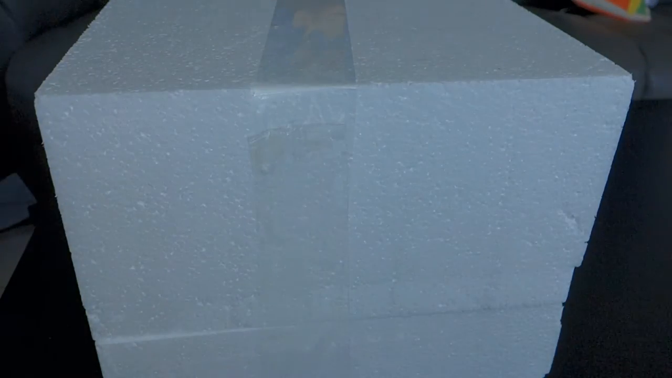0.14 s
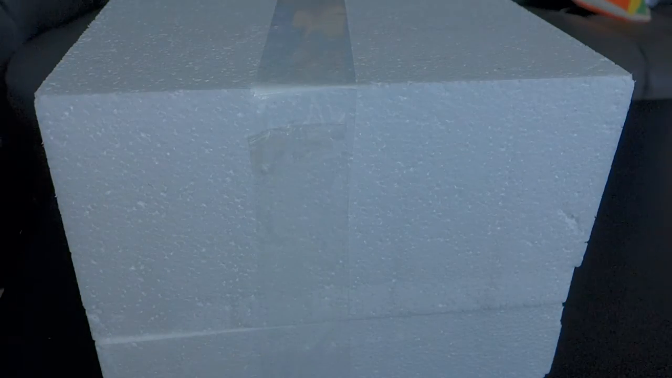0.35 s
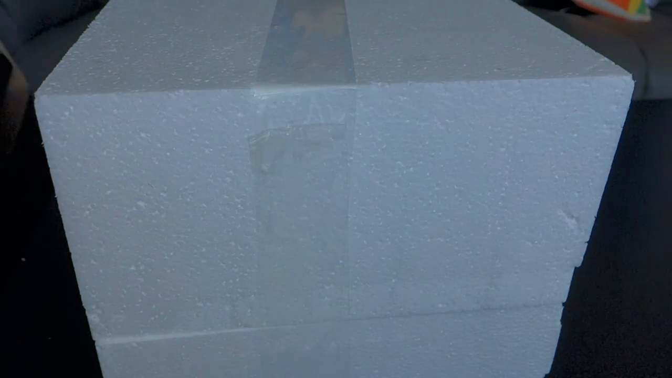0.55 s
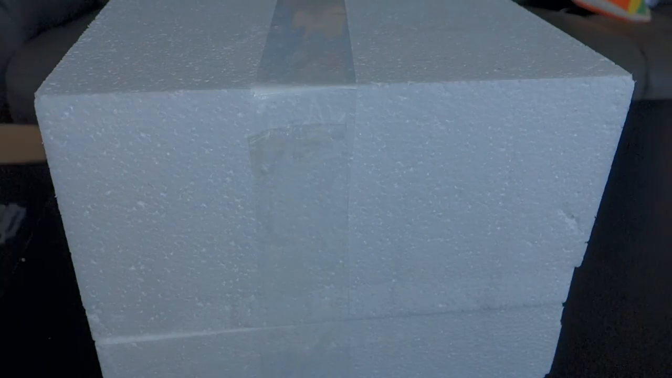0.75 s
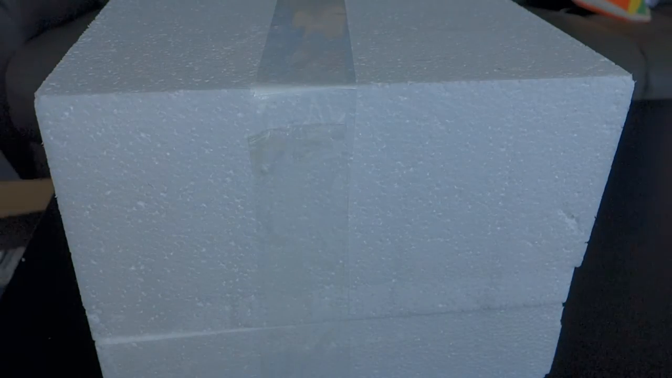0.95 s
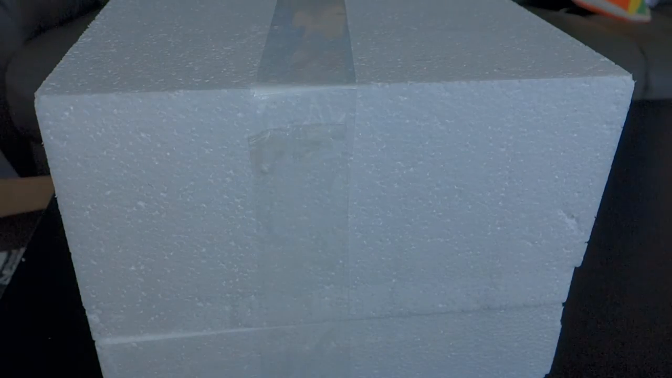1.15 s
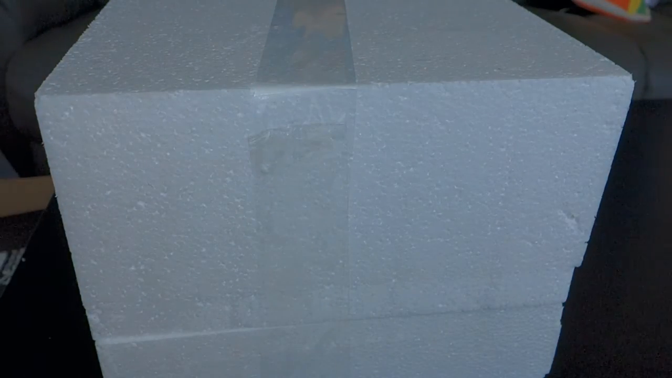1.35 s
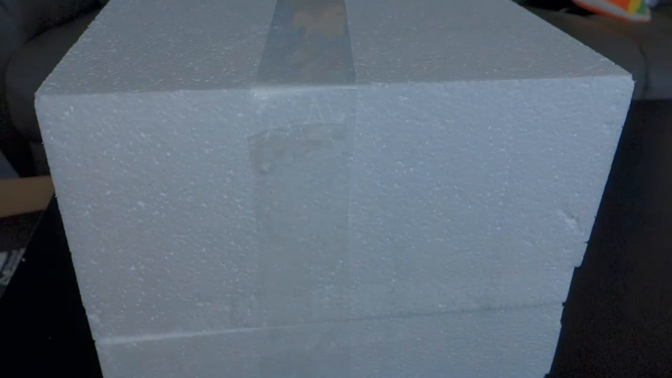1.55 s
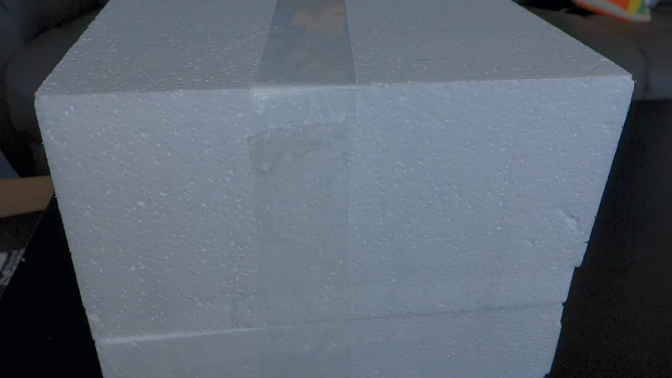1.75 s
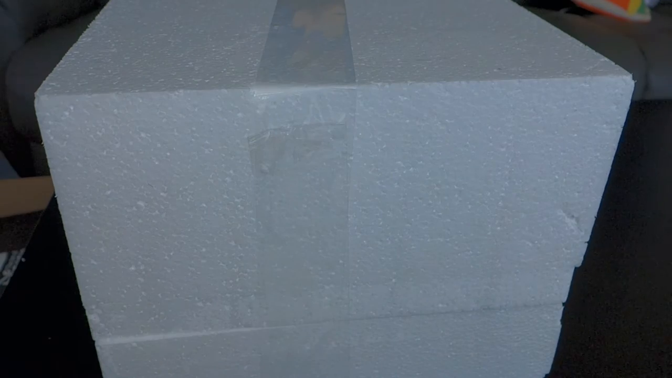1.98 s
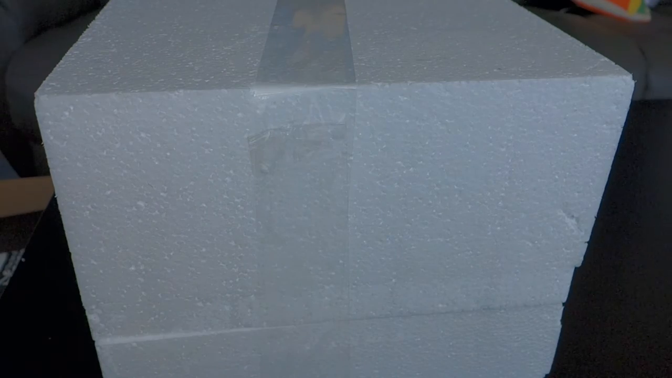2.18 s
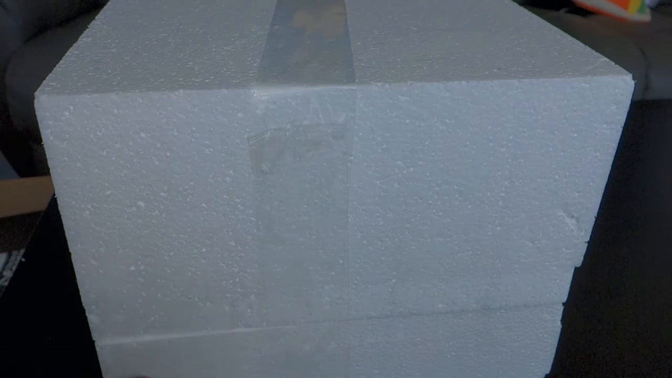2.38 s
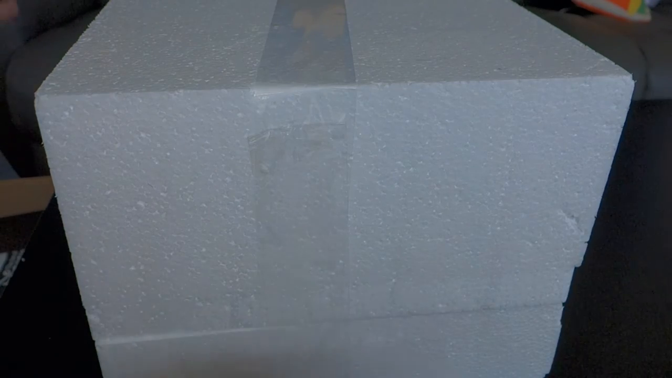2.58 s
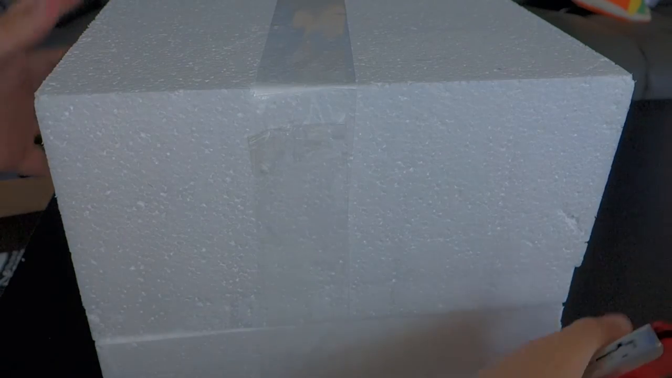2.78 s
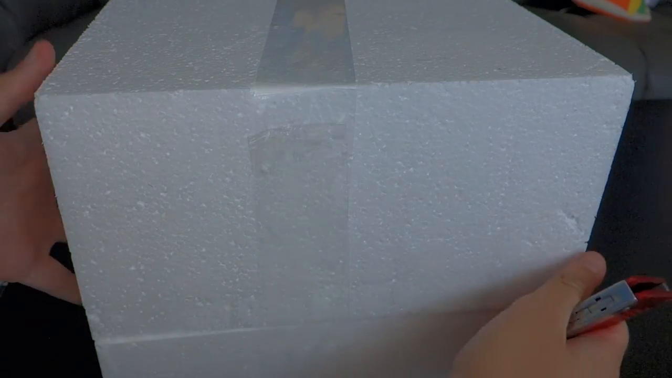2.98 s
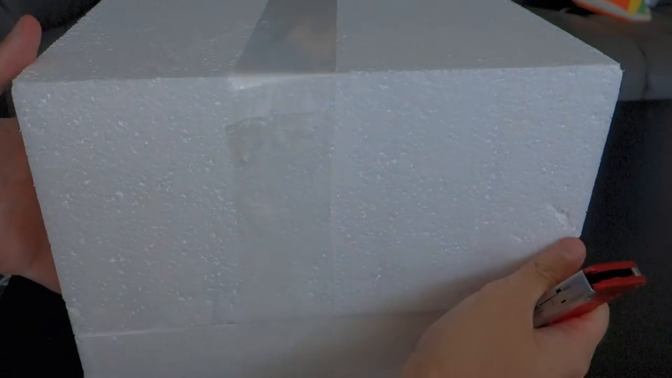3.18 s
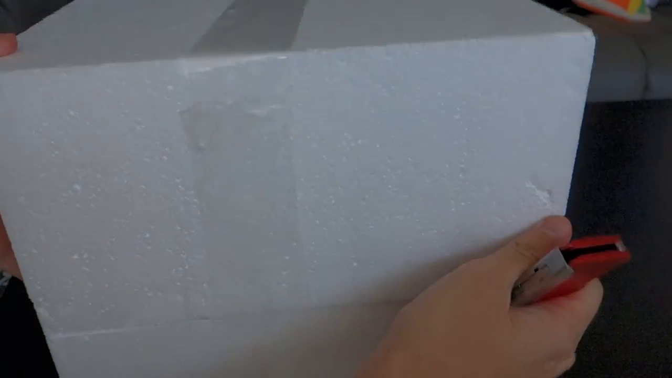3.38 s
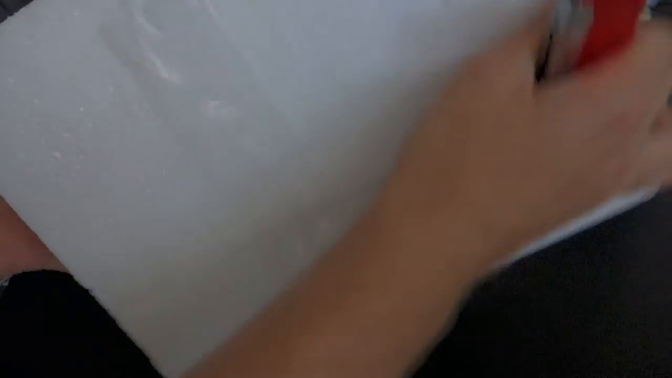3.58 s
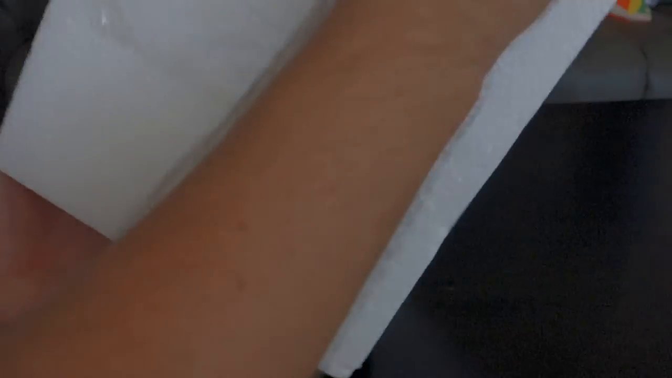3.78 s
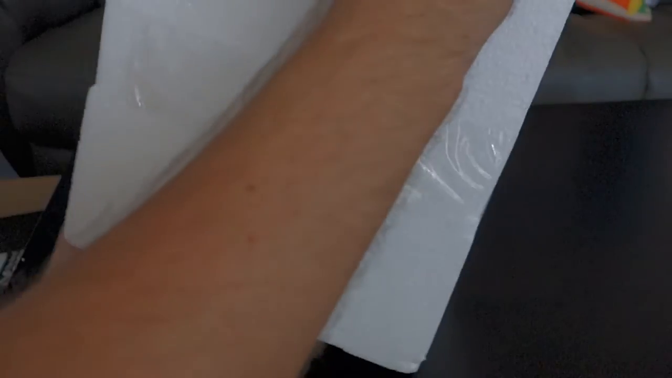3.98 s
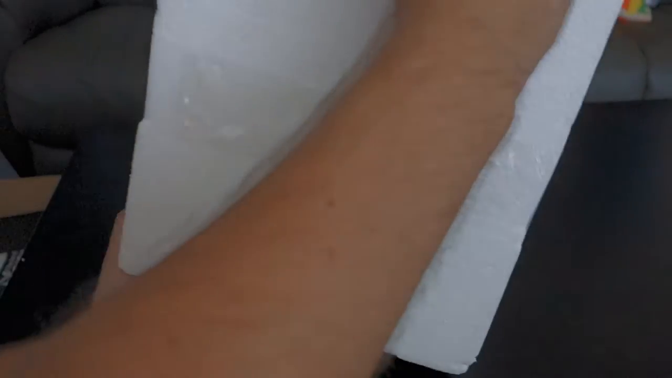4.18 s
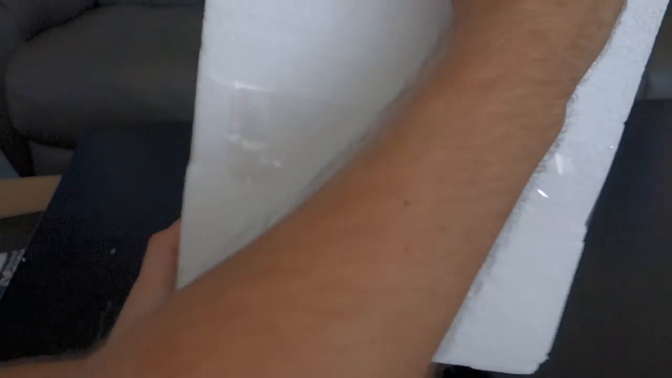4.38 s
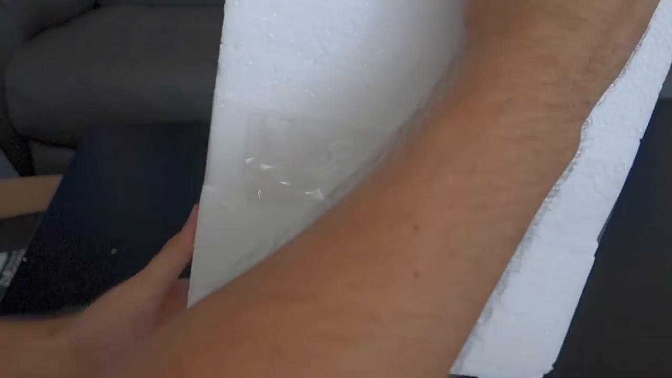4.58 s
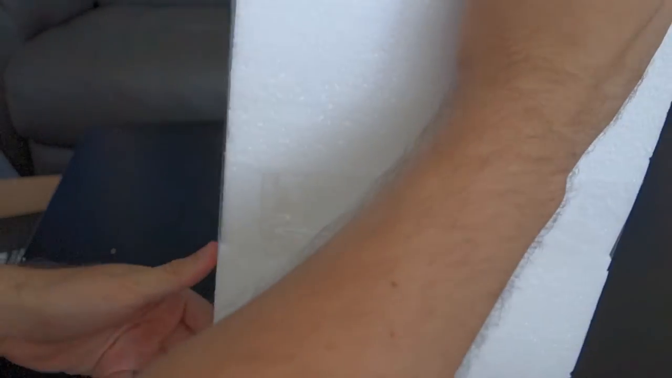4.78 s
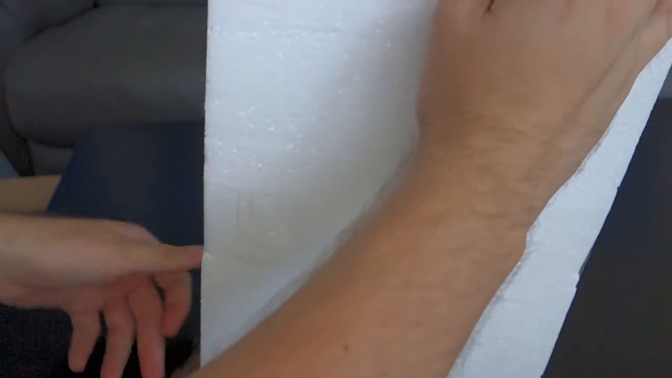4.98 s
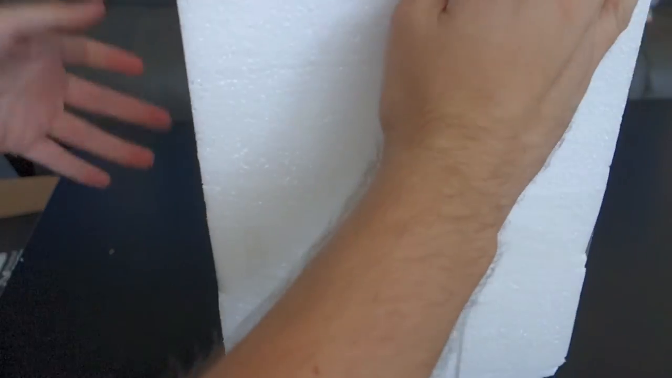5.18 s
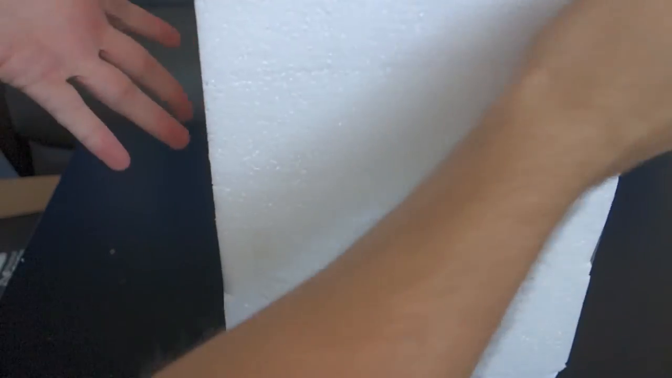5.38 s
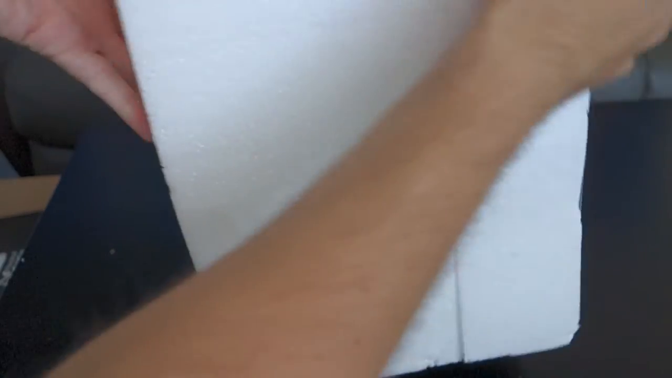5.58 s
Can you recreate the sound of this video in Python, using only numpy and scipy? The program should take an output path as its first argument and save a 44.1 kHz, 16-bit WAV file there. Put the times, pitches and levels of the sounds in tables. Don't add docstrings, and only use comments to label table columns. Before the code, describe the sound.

First, a hollow cardboard box is dragged at left with papery scuffs, a knock and a double thump. A lull leaves room hush, soft hum and small blade taps. Then polystyrene is handled close to the camera microphone, its beads scraping, fizzing, squeaking and cracking in uneven bursts, with low bumps against the table and a short room echo.

```python
import sys
import numpy as np
from scipy import signal
from scipy.fft import rfft, irfft, next_fast_len
from scipy.io import wavfile
from scipy.ndimage import uniform_filter1d

SR = 44100
rng = np.random.default_rng(int(sys.argv[2]) if len(sys.argv) > 2 else 0)


def transcribe(signal):
    frames = np.atleast_2d(signal).T
    limited = np.clip(frames, -1, 1)
    pcm = np.round(limited * 32767).astype(np.int16)
    wavfile.write(sys.argv[1], SR, pcm)


def nominal_scale(level):
    x = np.asarray(level, float) / 20
    return 10 ** x


N = 248724


def unit(x):
    return x / np.sqrt(np.mean(x ** 2) + 1e-20)


def along(points, hz):
    f, v = np.transpose(points)
    return np.interp(np.log(hz + 1), np.log(f + 1), v)


def add(track, s, sound):
    part = track[..., round(s * SR):][..., :sound.shape[-1]]
    part += sound[..., :part.shape[-1]]


def filtered(x, response):
    m = next_fast_len(N + SR // 2)
    return irfft(rfft(x, m) * response(np.fft.rfftfreq(m, 1 / SR)), m)[..., :N]


def colour(spectrum):
    return lambda hz: nominal_scale(along(spectrum, hz)) * np.minimum(hz / spectrum[0][0], 1) ** 3


def modes(table):
    def response(f):
        total = 0
        for k, (centre, width, db) in enumerate(table):
            resonance = 1j * f * width / (centre * centre - f * f + 1j * f * width)
            total = total + (-1) ** k * nominal_scale(db) * resonance
        return total
    return response


def strokes(rows, fade_db_per_s, offset_db=0, follows=0):
    t = np.arange(0, N + 16, 16) / SR
    power = np.zeros(len(t))
    for s, rise, hold, db, *kind in rows:
        rise_db = 20 * (np.maximum(s - t, 0) / max(rise, 0.003)) ** 0.94
        fade_db = fade_db_per_s * np.maximum(t - s - hold, 0)
        loss_db = np.minimum(rise_db + fade_db, 150)
        power += nominal_scale(db + offset_db + follows * sum(kind) - loss_db) ** 2
    return np.interp(np.arange(N) / SR, t, np.sqrt(power))


# [f/Hz, likeness/1]
LIKENESS = [(60, 1), (250, 1), (1000, 0.9), (2000, 0.73), (4000, 0.51), (8000, 0.029), (14000, 0.02)]


def friction(response, patchy_db, slip_db, slips):
    z = signal.stft(rng.standard_normal((2, N)), nperseg=256)[2]
    patches = uniform_filter1d(rng.standard_normal(z.shape[1:]), 4, axis=0)
    patches = unit(uniform_filter1d(patches, 18, axis=1))
    pair = signal.istft(z * nominal_scale(patchy_db * patches), nperseg=256)[1][:, :N]

    slip_sizes = np.minimum(rng.exponential(size=N // 20), 3.5)
    when = np.arange(N) * np.clip(slips, 5, 2000) / SR
    pair = pair * nominal_scale(slip_db * np.interp(when, np.arange(len(slip_sizes)), slip_sizes))

    def spread(hz):
        angle = np.arccos(np.clip(along(LIKENESS, hz), -1, 1)) / 2
        return response(hz) * [np.cos(angle), np.sin(angle)]
    mid, side = filtered(pair, spread)
    return unit(np.array([mid + side, mid - side]))


# [f/Hz, level/dB per Hz]
HUSH = [(13, -68), (22, -29), (80, -6.5), (174, -8.5), (205, -4.5), (310, -7.5), (398, -9.5), (444, -8.5),
        (690, -10), (961, -13), (1810, -16), (2900, -25.5), (13600, -34.5), (16000, -34)]
# [f/Hz, width/Hz, level/dB]
APPLIANCE = [(130, 26, -80), (156.3, 12, -68.5), (203.8, 20, -67.5), (262.4, 18, -69.5)]
# [t/s, level/dB]
TRAFFIC = [
    (0, -57),
    (.9, -81),
    (1.08, -49),
    (1.49, -74),
    (2.34, -85),
    (3.27, -66),
    (3.63, -76.5),
    (4.2, -62.5),
    (5.64, -65.5),
]
# [t/s, rise/s, hold/s, level/dB]
TABLE_SWAYS = [
    (1.02, 0.073, .08, -66),
    (5.23, 0.088, 0.018, -54.5),
]


def quiet():
    t = np.arange(N) / SR

    def blur(hz, width):
        return unit(filtered(rng.standard_normal(N), lambda f: modes([(hz, width, 0)])(f) ** 2))

    hush = nominal_scale(-58) * friction(colour(HUSH), patchy_db=0.5, slip_db=0.1, slips=40)
    hum = sum(nominal_scale(db) * blur(hz, width) for hz, width, db in APPLIANCE)
    hum += nominal_scale(-58) * np.sin(2 * np.pi * 204 * t + 0.9 * blur(6, 10))
    traffic = nominal_scale(np.interp(t, *np.transpose(TRAFFIC))) * blur(80, 29)
    sway = (nominal_scale(-78.5) + strokes(TABLE_SWAYS, fade_db_per_s=106)) * blur(22, 22)
    return hush + hum + traffic + sway


# [f/Hz, t60/s]
ROOM_DECAY = [(100, 0.22), (500, 0.21), (2000, 0.66), (6000, 0.57), (14000, 0.14)]


def room(x):
    hz, t, z = signal.stft(rng.standard_normal((2, SR * 2 // 3)), SR, nperseg=256)
    likeness = along(LIKENESS, hz)[:, None]
    z[1] = likeness * z[0] + np.sqrt(1 - np.clip(likeness, 0, 1) ** 2) * z[1]
    decay = nominal_scale(-60 * t / along(ROOM_DECAY, hz)[:, None])
    tail = signal.istft(z * decay, SR, nperseg=256)[1]
    late = np.pad(x.mean(axis=0), (200, 0))[None]
    return signal.fftconvolve(late, tail / np.linalg.norm(tail[0]), axes=1)[:, :N]


# [t/s, rise/s, hold/s, drumming level/dB, sliding: hiss over drumming/dB]
CARTON_MOVES = [(0, .02, 0.003, -39, -13.5), (.03, 0.016, .02, -51.5, -1), (.121, 0.0073, 0.1, -45.5, -9),
                (.252, 0.011, 0.031, -33.5, -22), (.3, 0.15, 0.11, -48.5, -11),
                (.485, 0.015, 0.063, -52.5, 1.5), (.61, 0.13, 0.0042, -44, -4.5),
                (.72, 0.08, 0.12, -54, -6), (.86, 0.19, 0.0017, -47.5, -13), (.9, 0.038, .05, -57, -2),
                (.96, 0.0032, 0.026, -19.5, -28.5), (1.05, 0.076, 0.029, -20, -21.5),
                (1.18, 0.22, 0.025, -40.5, -16), (1.32, 0.14, 0.041, -68, 5.5),
                (1.64, 0.12, 0.016, -48.5, -13.5), (1.745, 0.018, 0.021, -67, 20.5),
                (1.83, 0.051, 0.21, -86.5, 19.5)]
# [t/s, rise/s, hold/s, level/dB]
EDGE_SCUFFS = [
    (0.727, 0.14, 0.098, -57),
    (.958, 0.0033, 0.0082, -37.5),
    (1.025, 0.023, 0.0041, -34),
    (1.062, .04, 0.047, -37.5),
    (.248, .004, 0.016, -58),
    (0.124, 0.011, 0.025, -52.5),
]
# [f/Hz, width/Hz, level/dB]
CARTON_PANELS = [(70.6, 18, -34), (135, 93, -7), (204, 26, 0.5), (245, 15, 4), (299.5, 19.7, 5),
                 (336, 33, 5), (401, 70, -0.5), (497, 74, -1.5), (567, 30, -3.5), (619, 44, -4.5),
                 (750, 23, -18)]
# [f/Hz, level/dB per Hz]
EDGE_COLOUR = [(700, -0.5), (1000, -3.5), (1550, -7), (2100, -9.5), (2600, -12.5), (4000, -20.5),
               (5200, -42), (8800, -120)]
# [f/Hz, level/dB per Hz]
PAPER_COLOUR = [(1760, -17.5), (3000, -10.5), (4660, -8), (9140, -12), (10000, -14), (15000, -19),
                (16000, -46)]


def carton():
    fade = 174
    drum = strokes(CARTON_MOVES, fade)
    face = strokes(CARTON_MOVES, fade, follows=1)
    edge = strokes(CARTON_MOVES, fade, offset_db=-1, follows=0.52) + strokes(EDGE_SCUFFS, fade)

    def hollow(f):
        return modes(CARTON_PANELS)(f) / (1 + (f / 1100) ** 4) / (1 + (60 / (f + 1)) ** 6)

    sound = drum * friction(hollow, patchy_db=0.5, slip_db=2.0, slips=110)
    scrape = edge * friction(colour(EDGE_COLOUR), patchy_db=2.0, slip_db=0.5, slips=180)
    sound += nominal_scale([[1.2], [-1.2]]) * scrape
    sound += face * friction(colour(PAPER_COLOUR), patchy_db=-1.0, slip_db=2.0, slips=380)
    return sound * nominal_scale([[0.3], [-0.3]])


# [t/s, peak level/dB, f/Hz, t60/s, lower mode level/dB]
BLOWS = [(.118, -31, 600, 0.025, -5), (0.2452, -16.5, 327, 0.12, -14), (0.247, -17, 423, 0.066, -32),
         (0.743, -30.5, 567, 0.039, -10), (.957, -15.5, 217, 0.13, -7.5), (1.028, -14, 336, 0.12, -8),
         (.247, -22.5, 730, 0.042, -10), (0.412, -32.5, 380, 0.038, -17), (3.637, -26.5, 278, 0.019, -22),
         (3.652, -38, 417, 0.13, -7), (4.426, -26, 254, 0.028, -8), (5.1423, -8.5, 184, 0.04, -13),
         (5.5044, -15, 433, 0.023, -8.5), (5.506, -28, 191, 0.089, -6.5), (0.954, -32, 200, 0.023, -6)]


def knocks():
    track, t = np.zeros(N), np.arange(SR // 3) / SR
    for s, db, hz, t60, lower_db in BLOWS:
        turn = 2 * np.pi * hz * t
        fade_db = 60 * t / max(t60, 0.02)
        ring = nominal_scale(-fade_db) * (np.sin(turn) + 0.43 * np.sin(1.237 * turn))
        upper_db = -5.5 + 0.43 * db
        ring += nominal_scale(upper_db - 2.0 * fade_db) * np.sin(2.12 * turn)
        ring += nominal_scale(lower_db - 0.54 * fade_db) * np.sin(0.62 * turn)
        rise = 1 - np.exp(-t * hz / 0.65)
        add(track, s, -nominal_scale(db) * rise * ring)
    return track


# [t/s, level/dB]
BLADE_JOLTS = [
    (1.706, -52),
    (1.714, -43),
    (1.943, -40),
    (2.068, -47),
    (2.075, -46),
    (2.395, -53),
    (2.739, -36),
    (2.853, -57),
]
# [f/Hz, width/Hz, level/dB]
BLADE_MODES = [(2550, 300, -5.5), (3800, 240, 0), (4600, 230, -6), (5400, 400, -3.5), (7000, 3000, -9)]


def knife():
    track, t = np.zeros(N), np.arange(SR // 40) / SR
    for s, db in BLADE_JOLTS:
        tap = t == 0
        chatter = 0.23 * nominal_scale(-60 * t / 0.012) * rng.standard_normal(len(t))
        add(track, s, nominal_scale(db + 20) * (chatter + tap))
    return filtered(track, lambda f: modes(BLADE_MODES)(f) / (1 + (1900 / (f + 1)) ** 6))


# [t/s, peak level/dB, lower f/Hz, upper f/Hz, pan/dB]
SNAPS = [(0.12, -32, 900, 1540, 6), (0.246, -34, 1080, 1710, 8), (4.3936, -23, 2680, 3850, 2),
         (0.956, -47, 2100, 4400, 5), (1.6173, -41.5, 5800, 8800, 10), (2.739, -26, 2500, 5050, -6),
         (2.995, -23, 1580, 7100, 1), (3.145, -40, 2940, 4900, .6), (3.173, -20.5, 2880, 7260, -3),
         (3.2216, -24, 3660, 4360, 8), (3.713, -25, 2070, 5600, 11), (3.758, -5, 3240, 5800, 1),
         (3.7636, -12.5, 2480, 5560, -7), (3.748, -27, 3320, 5900, 2), (3.8753, -19.5, 3860, 7000, -1),
         (4.1039, -15, 3737, 4380, -.6), (4.26, -9.5, 4640, 7000, -1), (4.3309, -16, 2350, 6730, -1),
         (4.481, -12, 2770, 4600, -.6), (4.49, -31, 2310, 4540, .6), (4.509, -16, 3000, 4600, 2.1),
         (4.628, -16.5, 2230, 4630, 4), (5.0405, -13, 3400, 4600, 2), (5.2072, -16, 3420, 5420, -4),
         (5.3427, -30, 2330, 6300, -1), (5.5018, -16, 3500, 6700, -4), (5.505, -18.5, 1300, 3600, 1)]
# [t/s, peak level/dB, lower f/Hz, upper f/Hz]
KNIFE_TICKS = [
    (1.944, -43, 2650, 4600),
    (1.949, -40, 2470, 6340),
    (2.079, -42, 2580, 5400),
    (2.133, -46.5, 3300, 5600),
]
# [t/s, peak level/dB, lower f/Hz, upper f/Hz]
TAPE_CRACKLES = [(3.4, -38, 3380, 4380), (4.2268, -40, 3200, 4400), (4.362, -50, 3300, 4400),
                 (2.9595, -39, 3500, 5000), (2.967, -36, 3300, 5200), (3.0016, -36, 3500, 7000),
                 (4.2436, -32, 2700, 6500), (5.106, -21, 2200, 5460), (5.5465, -22, 2830, 6500),
                 (5.5524, -23, 2300, 4400), (3.6138, -42, 2100, 4400), (3.718, -37, 5500, 8000),
                 (5.4646, -48, 2660, 4400), (1.262, -49, 4000, 7000), (1.48, -49, 4000, 7000)]


def clicks():
    track, t = np.zeros((2, N)), np.arange(SR // 60) / SR
    rows = [(*row, -8) for row in SNAPS]
    rows += [(*row, 20, -8) for row in KNIFE_TICKS]
    rows += [(*row, -1, 25.5) for row in TAPE_CRACKLES]
    shape = (1 - np.exp(-t / 0.0006)) * nominal_scale(-60 * t / 0.0079)
    for s, db, low_hz, high_hz, pan_db, treble_db in rows:
        noise = rng.standard_normal(len(t))
        crack = uniform_filter1d(noise, size=5) - uniform_filter1d(noise, size=15)
        ring = np.sin(2 * np.pi * low_hz * t) + 1.07 * np.sin(2 * np.pi * high_hz * t)
        ring += 0.46 * np.sin(np.pi * (low_hz + high_hz) * t)
        spark = nominal_scale(treble_db - 12) * np.diff(noise, 2, prepend=[0, 0]) / 3.6
        snap = nominal_scale(db - 6) * shape * (ring + 1.78 * crack + spark)
        add(track, s, snap * nominal_scale([[pan_db / 2], [-pan_db / 2]]))
    return track


# [t/s, length/s, f/Hz, level/dB, blur: share
SLIPS_AND_RINGS = [(0.115, 0.061, 750, -41, 1.5), (0.133, 0.066, 1947, -43, 1.5),
                   (0.522, 0.054, 738, -36, 2.03), (0.587, .03, 1070, -44, 1.5),
                   (0.601, 0.02, 4580, -44, 0.76), (0.734, 0.028, 1780, -48, .8),
                   (.838, 0.022, 1340, -47, 1.1), (0.839, 0.027, 385, -34, 1), (1.605, .075, 3770, -62, 0.3),
                   (1.6, .07, 2550, -73, 0.57), (1.618, 0.07, 750, -41, 3.77), (1.742, .09, 4030, -60, 0.96),
                   (3.137, 0.027, 2860, -37.5, 1), (3.202, .04, 1700, -37, 1.9),
                   (3.206, 0.054, 3800, -39, 1.1), (3.241, .12, 4580, -40, 0.79),
                   (3.257, 0.13, 1492, -41.5, 2.01), (3.4, 0.12, 1760, -45.5, 1.63),
                   (3.707, 0.04, 1779, -31.5, 1.3), (3.803, 0.026, 4160, -37, 0.52),
                   (3.974, 0.046, 1296, -41.5, 1), (4.032, 0.041, 7000, -33, 0.57),
                   (4.412, 0.09, 2817, -34, 0.56), (4.464, 0.041, 1112, -31.5, 2.14),
                   (4.5, .035, 4400, -45, 0.53), (4.616, 0.039, 1184, -27.5, 2.44),
                   (4.718, 0.09, 7530, -36, 0.63), (4.764, 0.044, 3510, -29, 0.97),
                   (4.861, 0.13, 1562, -37.5, 1.99), (4.881, 0.094, 3630, -34.5, 0.75),
                   (5.103, 0.03, 2090, -35.5, 0.68), (5.343, 0.017, 2340, -45, 0.31),
                   (5.372, .03, 4160, -42, 0.58), (5.609, 0.073, 1890, -29, 0.34),
                   (0.997, .18, 340.2, -23, 0.93), (0.971, 0.092, 245, -20, 1.1),
                   (2.747, .09, 4850, -60, 0.48), (3.976, 0.041, 2290, -46, 0.84),
                   (1.085, .12, 335.5, -33, .8), (1.026, 0.087, 637, -30, 1.1),
                   (4.029, 0.15, 290.5, -47.5, 2.1), (0.722, 0.044, 980, -62, 2),
                   (0.25, .065, 740, -30, .3), (.262, 0.043, 1150, -44, .6), (0.268, .03, 1200, -43, .6),
               (.19, 0.055, 380, -42, .8), (.33, .045, 370, -40, 0.97), (2.74, 0.073, 3760, -60, .45),
               (2.738, .07, 5050, -58, .5), (2.066, .11, 3800, -64, .7), (2.069, 0.065, 2580, -62, 0.43),
               (3.14, 0.022, 1740, -37, 1.34), (3.203, 0.034, 5800, -39, .8),
               (3.215, .025, 4500, -36, 0.76), (3.42, 0.11, 2100, -48, 1.5), (3.46, 0.054, 4600, -44, 0.57),
               (3.469, 0.055, 6100, -40, .6), (3.992, 0.063, 1300, -45.5, 0.74),
               (4.0, 0.072, 5000, -35, 0.66), (4.492, 0.033, 6200, -32, 0.65),
               (4.929, .08, 1150, -40.5, 1.6), (5.087, 0.017, 300, -40, 1), (5.515, 0.028, 510, -37.5, 1),
               (5.575, .025, 500, -44, 1), (.255, .06, 300, -33, .6), (1.63, 0.038, 650, -43, 1.9),
               (4.9, .04, 140, -46, 1), (4.5, .04, 4000, -36, .9), (1.025, 0.027, 1260, -25.5, 1),
               (1.11, 0.18, 1160, -45.5, 1.1), (.956, .02, 1210, -26.5, 1.9),
               (1.938, 0.082, 4600, -71, 0.36)]


def squeaks():
    track = np.zeros(N)
    for s, length, hz, db, blur in SLIPS_AND_RINGS:
        t = np.arange(int(length * SR)) / SR
        wander = blur * 0.1167 * (hz / 1600) ** 1.097
        steps = rng.standard_normal((3, len(t)))
        phase = np.cumsum(wander * steps, axis=1) + np.arange(3)[:, None]
        patches = np.sin(2 * np.pi * hz * t + phase).sum(axis=0)
        swell = np.sqrt(np.abs(np.sin(np.pi * t / length)))
        add(track, s, nominal_scale(db - 9) * swell * patches)
    return track


# [t/s, length/s, jump level/dB]
HAND_GRIPS = [(2.994, 0.032, 11.5), (3.138, 0.025, 7), (3.712, 0.11, 9), (3.7, 0.012, 7),
              (4.254, 0.014, 13.5), (4.614, 0.046, 3), (3.028, 0.008, 5), (4.391, 0.023, 6.5),
              (6.4, 0.021, 2), (3.4, 0.01, 6), (5.138, 0.0085, 5), (5.092, 0.042, 2), (5.338, 0.029, 15.5),
              (5.5005, 0.0072, 30), (6.3, 0.011, 16), (3.204, 0.01, 1.5), (3.875, 0.007, 3),
              (5.04, .005, 3), (3.765, 0.0063, 5), (6.8, 0.011, -1), (3.829, 0.0043, 1), (4.329, 0.0059, 2),
              (4.6, 0.015, 2), (4.062, 0.026, -2.5), (3.012, .006, 4), (3.829, .004, 5)]


def grips():
    jump_db, t = np.zeros(N), np.arange(SR // 8) / SR
    for s, length, db in HAND_GRIPS:
        add(jump_db, s, db * (1 - np.exp(-t / 0.002)) / (1 + (t / length) ** 4))
    return nominal_scale(jump_db)


# [t/s, rise/s, hold/s, rub level/dB, lightness: bead fizz over rub/dB]
HAND_STROKES = [(2.965, 0.0099, 0.11, -52, 4), (3.13, 0.15, 0.071, -47, -4),
                (3.22, 0.063, 0.0054, -36, -7.5), (3.27, 0.078, 0.076, -42.5, -2),
                (3.44, 0.13, 0.03, -45.5, -9), (3.5, 0.07, 0.02, -44, 7.5),
                (3.655, 0.094, 0.0041, -39.5, -4.5), (3.7, 0.041, 0.054, -47.5, 2),
                (3.83, 0.056, 0.033, -44, -2), (4.0, 0.056, 0.05, -38, 4), (4.11, 0.065, 0.034, -45, -2),
                (4.272, 0.039, 0.007, -44, -6), (4.43, 0.028, 0.026, -37, 4.5),
                (4.52, 0.24, 0.0027, -32.5, -3), (4.61, 0.11, 0.083, -37.5, -4),
                (4.73, 0.15, 0.05, -39.5, 6), (4.785, 0.09, 0.003, -36.5, -5),
                (4.9, 0.33, 0.082, -38.5, -8.5), (5.0, 0.24, 0.0028, -36, 1.2),
                (5.15, 0.19, 0.014, -33, -2.5), (5.25, 0.3, 0.066, -46.5, -0.5),
                (5.385, 0.059, 0.028, -49.5, 0), (5.535, 0.095, 0.051, -46, -2),
                (5.63, 0.026, .02, -33, -3)]
# [t/s, rise/s, hold/s, rumble level/dB]
TABLE_DRAGS = [(2.97, 0.059, .12, -58), (3.13, 0.13, 0.03, -51.5), (3.22, 0.067, .005, -50.5),
               (3.65, 0.11, 0.042, -47.5), (3.87, 0.25, 0.016, -54), (4.07, 0.5, 0.14, -57),
               (4.275, 0.16, 0.16, -55.5), (4.465, 0.12, 0.0055, -42.5), (4.55, .1, 0.049, -52.5),
               (4.74, 0.26, .005, -45.5), (4.85, 0.12, 0.18, -60), (5.08, 0.051, 0.018, -49),
               (5.2, 0.27, 0.15, -50), (5.535, 0.049, 0.0039, -41.5), (5.64, .12, 0.0041, -50)]
# [t/s, left over right level/dB]
HAND_PLACES = [
    (2.95, 4.5),
    (3.13, 1.0),
    (3.24, 3),
    (3.81, 1.5),
    (3.96, -0.5),
    (4.77, 2),
    (4.87, 0),
    (5.56, 0.5),
    (5.64, 3),
]
# [f/Hz, level/dB per Hz]
RUB_COLOUR = [(1290, -26), (2200, -5), (3190, -6), (4560, -3), (5170, -6.5), (5660, -4), (8000, -9),
              (10400, -13), (17600, -120)]
# [f/Hz, level/dB per Hz]
BLOCK_COLOUR = [(560, -10.5), (800, -11.5), (1000, -6.5), (1250, -4.5), (1760, -6.5), (2700, -12),
                (3500, -11), (5900, -120)]
# [f/Hz, level/dB per Hz]
FIZZ_COLOUR = [(4120, -19.5), (7000, -11.5), (12600, -11.5), (15750, -20.5), (16300, -54)]
# [f/Hz, level/dB per Hz]
TABLE_COLOUR = [(32, -40), (55, -47), (75, -4), (108, -7.5), (151, -4.5), (323, 1.5), (432, -5), (800, -6),
                (1040, -30), (1760, -120)]


def foam():
    fade = 220
    rub = strokes(HAND_STROKES, fade)
    fizz = strokes(HAND_STROKES, fade, follows=0.98)
    block = strokes(HAND_STROKES, fade, offset_db=-9.5, follows=-0.45)
    table = strokes(TABLE_DRAGS, fade_db_per_s=157)
    block = block + nominal_scale(-5) * table

    sound = rub * friction(colour(RUB_COLOUR), patchy_db=2.5, slip_db=1.1, slips=360)
    sound += block * friction(colour(BLOCK_COLOUR), patchy_db=1.5, slip_db=2.0, slips=150)
    sound += fizz * friction(colour(FIZZ_COLOUR), patchy_db=1.5, slip_db=1.4, slips=150)
    pan_db = 0.89 * np.interp(np.arange(N) / SR, *np.transpose(HAND_PLACES))
    sound = sound * grips() * nominal_scale(np.outer([0.5, -0.5], pan_db))
    rumble = table * friction(colour(TABLE_COLOUR), patchy_db=1.3, slip_db=-2.0, slips=120)
    return sound + rumble


def scene():
    rubbing = carton() + foam() + squeaks()
    blows, snaps, blade = knocks(), clicks(), knife()
    echo = room(nominal_scale(-11) * rubbing + nominal_scale(-6) * blows + nominal_scale(-15.5) * snaps + nominal_scale(2.5) * blade)
    return rubbing + blows + snaps + blade + echo + quiet()


def roll_off(x):
    return signal.sosfilt(signal.butter(12, 16500, fs=SR, output="sos"), x)


# [f/Hz, lead/rad]
PORT_LEAD = [(50, -.1), (130, -.16), (290, -.42), (600, -.4), (3300, -.05), (8000, 0)]


def record(dry):
    def camera(hz):
        lead = np.exp(0.5j * along(PORT_LEAD, hz) * [[1], [-1]])
        return lead / (1 + (hz / 15870) ** 400)

    mix = filtered(dry, camera)
    mix = mix / (1 + np.abs(mix / 0.36) ** 4) ** (1 / 4)
    return roll_off(mix)


dry = scene()
out = record(dry)
transcribe(out)
```